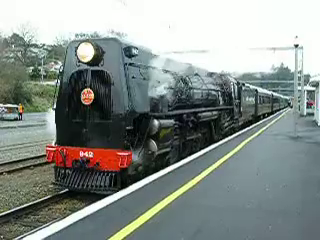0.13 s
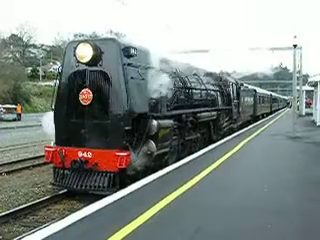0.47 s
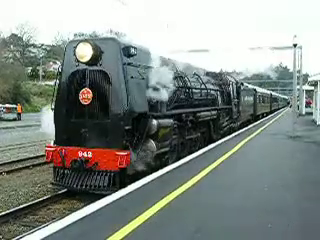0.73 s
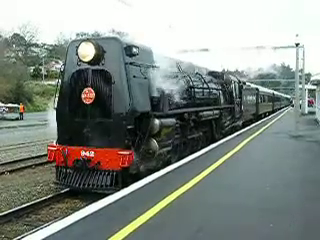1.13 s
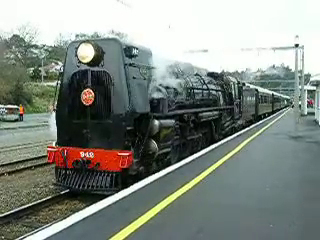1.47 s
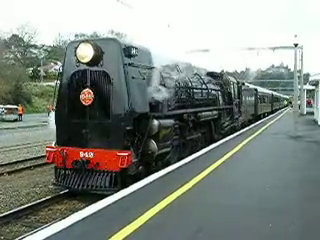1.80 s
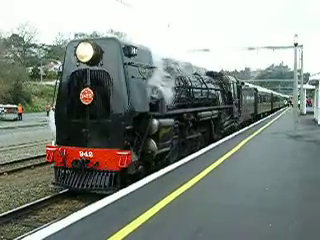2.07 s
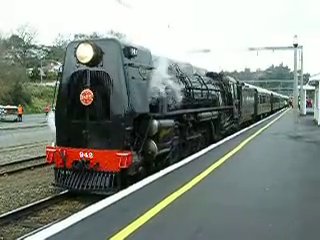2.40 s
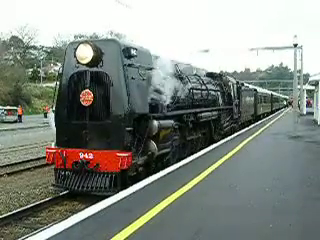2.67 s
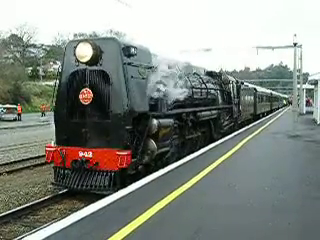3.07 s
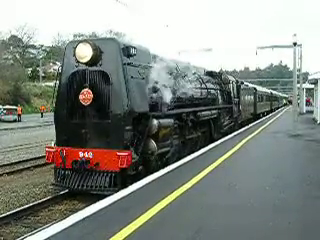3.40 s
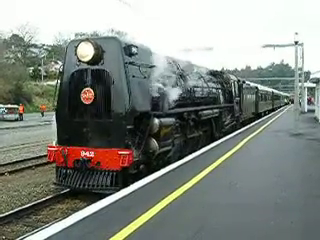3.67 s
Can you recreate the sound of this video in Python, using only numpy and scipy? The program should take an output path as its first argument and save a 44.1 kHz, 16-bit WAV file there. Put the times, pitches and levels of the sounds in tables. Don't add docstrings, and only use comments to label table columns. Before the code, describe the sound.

A stationary steam locomotive roars low and steadily, its boiler humming hollowly. Silence breaks with a camera pop near 0.07 s, then faint gritty electronic whine until a soft thump at 0.26 s opens the engine sound. Muted hiss and a thin, steady turbine whine continue to the end. Small pings, knocks and ticks appear from 2.25 s, with a slight swell and low knock around 3.5 s. Narrow, grainy outdoor sound.

```python
import sys
import numpy as np
from scipy import signal
from scipy.io import wavfile
from scipy.ndimage import uniform_filter1d

SR = 44100
rng = np.random.default_rng(int(sys.argv[2]) if len(sys.argv) > 2 else 0)


def boost_factor(decibels):
    exponent = np.asarray(decibels, float) / 20
    return 10 ** exponent


def output_pcm(signal):
    pcm = np.clip(np.atleast_2d(signal).T, -1, 1) * 32767
    wavfile.write(sys.argv[1], SR, np.round(pcm).astype(np.int16))


N = 169785


def evened(x):
    return x / np.sqrt(np.mean(x ** 2) + 1e-20)


# time in seconds, draught level in dB, steam vent level in dB,
# share of the turbine's near side from 0 to 1.
ENGINE_MOVES = [(0.3, -25, -36, 0.5), (0.47, -24.5, -36, 0.7), (2.05, -24.5, -35.5, 0.8),
                (2.07, -26.5, -35, 0.8), (2.12, -23.5, -33.5, 0.3), (2.23, -25.5, -36.5, 0.3),
                (2.37, -25, -35, 0.4), (2.54, -22, -37, 0.4), (2.69, -26.5, -39, 0.7),
                (2.7, -24, -40.5, 0.3), (3.07, -26.5, -41.5, 0.2), (3.41, -26.5, -40.5, 0),
                (3.43, -25.5, -38, 0.3), (3.53, -21, -38, 0.4), (3.73, -23.5, -40.5, 0.1),
                (3.84, -24, -36, 0.4)]


def control(column):
    rows = np.array(ENGINE_MOVES)
    return np.interp(np.arange(N) / SR, rows[:, 0], rows[:, column])


def wander(per_s):
    a = np.exp(-2 * np.pi * per_s / SR)
    return evened(signal.lfilter([1], [1, -2 * a, a * a], rng.standard_normal(N)))


def resonate(x, hz, width):
    turn = np.exp(2j * np.pi * hz * np.arange(len(x)) / SR)
    r = np.exp(-np.pi * width / SR)
    smooth = signal.lfilter([1], [1, -2 * r, r * r], x / turn)
    return evened((turn * smooth).real)


def rush(colour, patchy_db, flicker_db, size=1024):
    frames = 4 * N // size + 5
    hz = np.fft.rfftfreq(size, 1 / SR)
    real, imag, patches = rng.standard_normal((frames, len(hz), 3)).T
    patches = uniform_filter1d(patches, size=6, axis=0)
    patches = evened(uniform_filter1d(patches, size=8, axis=1))
    flicker = evened(uniform_filter1d(rng.standard_normal(frames), size=3))
    f, db = np.transpose(colour)
    shape = np.interp(np.log(hz + 1), np.log(f + 1), db, -90, -90)[:, None]
    spectrum = (real + 1j * imag) * boost_factor(shape + patchy_db * patches + flicker_db * flicker)
    noise = signal.istft(spectrum, nperseg=size, noverlap=3 * size // 4)[1]
    return evened(noise[:N])


# frequency in Hz, level in dB per Hz.
ROAR_COLOUR = [(30, -52.5), (52, -24.5), (72, -10), (157, -6), (199, 0), (360, -1.5), (405, -16),
               (600, -45)]
# frequency in Hz, level in dB per Hz.
FLUE_COLOUR = [(220, -30), (380, -2.5), (408, -11.5), (465, -11.5), (614, -9.5), (704, -9.5), (871, -5.5),
               (1200, -21), (1400, -20.5), (1820, -51.5), (3080, -120)]
# frequency in Hz, width in Hz, level in dB.
HOLLOW_SPACES = [(89.3, 15, -15), (127, 19, -11), (200.2, 14, -16), (309.4, 22, -14), (368, 20, -8),
                 (442.8, 22, -24.5), (620, 41, -19.5), (773, 46, -15.5), (860, 40, -19.5), (898, 20, -20.5)]


def firebox():
    roar = boost_factor(-0.5) * rush(ROAR_COLOUR, 0.78, 0.4, size=4096)
    flues = boost_factor(-6.0) * rush(FLUE_COLOUR, 1.1, 0.45, size=2048)
    body = roar + flues
    for hz, width, db in HOLLOW_SPACES:
        body = body + boost_factor(db) * resonate(rng.standard_normal(N), hz, width)
    draught_db = control(column=1) + 0.9 * wander(14.0)
    return boost_factor(draught_db) * body


# frequency in Hz, level in dB per Hz.
HISS_COLOUR = [(900, -31.5), (1200, -7.5), (1600, -7.5), (2200, -8.5), (2700, -2.5), (3300, -12),
               (3760, -6), (3990, -15.5)]


def vent():
    jet_db = control(column=2) + 0.87 * wander(150.0)
    jet = boost_factor(jet_db) * rush(HISS_COLOUR, 0.76, 0.8, size=256)
    breath = resonate(rng.standard_normal(N), 1600, 600) * boost_factor(control(column=1) - 19.0)
    return jet + breath


SHAFT_ORDERS = [14, 21.21, 22, 23, 24, 25, 26, 27, 29, 30, 31, 33, 34, 35, 36, 38, 40, 41, 42, 53]
# near side level in dB, far side level in dB.
WHINE_SIDES = [(-49, -42), (-50.5, -49.5), (-52.5, -49.5), (-51, -44.5), (-56, -54), (-56, -54.5),
               (-49, -49), (-60, -61), (-62, -59.5), (-38.5, -46.5), (-55, -49), (-51.5, -50), (-59, -52.5),
               (-51, -52), (-60, -60), (-52, -52.5), (-58, -63), (-59.5, -59), (-51, -55), (-55.5, -57)]


def turbine():
    shaft_hz = 70.09
    turns = np.cumsum(shaft_hz * (1 + 0.0003 * wander(1.5))) / SR
    near = np.clip(control(column=3), 0, 1)
    whine = np.zeros(N)
    for order, (near_db, far_db) in zip(SHAFT_ORDERS, WHINE_SIDES):
        tone_db = far_db + (near_db - far_db) * near + 1.0 * wander(5.9)
        tone = np.sin(2 * np.pi * (order * turns + rng.random()))
        whine += boost_factor(tone_db) * np.sqrt(2) * tone
    return whine


# start in seconds, frequency in Hz, level in dB,
# time to fall 60 dB in seconds.
PIPE_PINGS = [
    (2.255, 898, -21.5, .12),
    (2.485, 368, -17.5, 0.28),
    (2.535, 860, -20.5, 0.13),
    (2.810, 763, -20, .05),
    (2.973, 1614, -28, 0.045),
    (3.336, 1867, -19, .04),
    (3.500, 1614, -25, 0.16),
    (3.51, 372, -16, .4),
]


def pings():
    out, t = np.zeros(N), np.arange(N) / SR
    for start, hz, db, t60 in PIPE_PINGS:
        since = np.maximum(t - start, 0)
        soft_edge = 1 - np.exp(-since / 0.0034)
        out += boost_factor(db - 60 * since / t60) * soft_edge * np.sin(2 * np.pi * hz * since)
    return out


def scene():
    return (firebox() + vent() + turbine() + pings())[None]


def microphone(air):
    open_s, thump, thump_rise_s, thump_fall_s = 0.2569, 0.24, 0.0008, 0.0045
    t = np.arange(N) / SR
    since = np.maximum(t - open_s, 0)
    settling = thump * (1 - np.exp(-since / thump_rise_s)) * np.exp(-since / thump_fall_s)
    return (t > open_s) * (air + settling)


def idle_electronics():
    idle_hz, idle_db, noise_db = 1130, -57.5, -52
    t = np.arange(N) / SR
    whine = boost_factor(idle_db + 2.5 * wander(74.0)) * np.sin(2 * np.pi * idle_hz * t)
    return whine + boost_factor(noise_db) * rng.standard_normal(N)


def converter(x):
    power_s, let_go_s = 0.0725, 0.0740
    pop, pop_step, pop_fall_s = -0.7, 0.32, 0.0014
    offset, step, smooth_hz = -0.0098, 0.0055, 3946
    slow = signal.resample_poly(x, 5, 28, window=("kaiser", 3), padtype="reflect") + offset
    after = np.arange(len(slow)) * 28 / 5 / SR - let_go_s
    slow = np.where(after < 0, pop, slow - pop_step * np.exp(-abs(after) / pop_fall_s))
    stepped = step * np.round(slow / step)
    taps = signal.firwin(2 * 16 * 28 + 1, smooth_hz, window=("kaiser", 9), fs=5 * SR)
    coarse = signal.resample_poly(stepped, 28, 5, window=taps, padtype="reflect")[:N]
    return coarse * (np.arange(N) / SR > power_s)


def band_limit(x):
    return signal.sosfilt(signal.butter(12, 16300, fs=SR, output="sos"), x)


def record(dry):
    mix = converter(microphone(dry[0]) + idle_electronics())[None]
    return band_limit(mix)


dry = scene()
out = record(dry)
output_pcm(out)
```